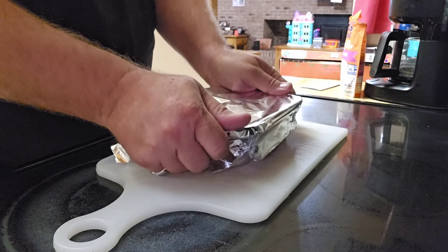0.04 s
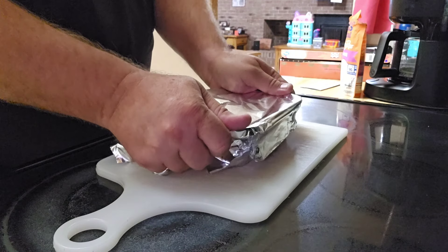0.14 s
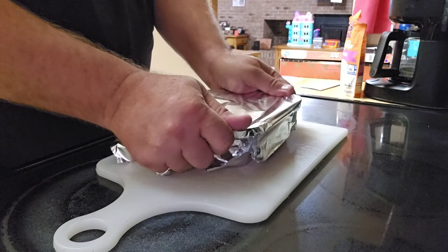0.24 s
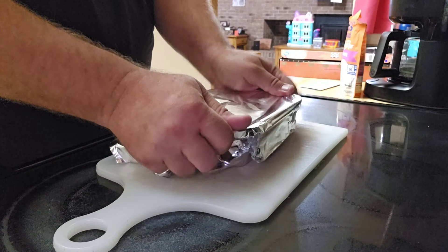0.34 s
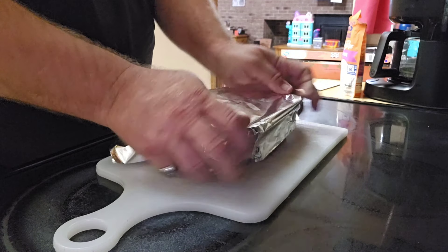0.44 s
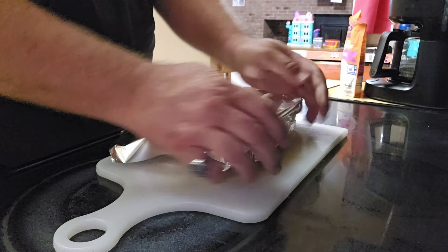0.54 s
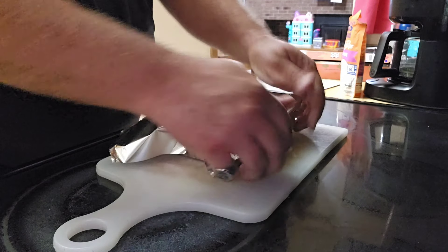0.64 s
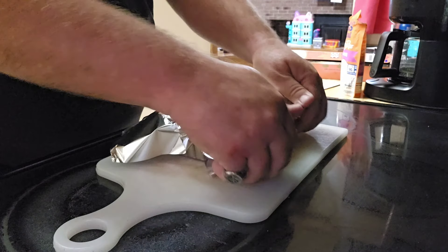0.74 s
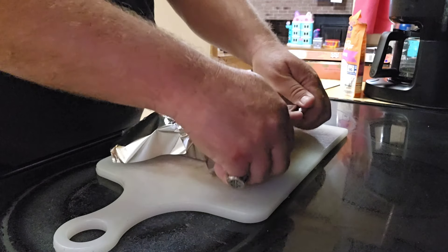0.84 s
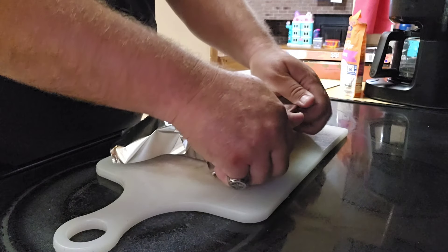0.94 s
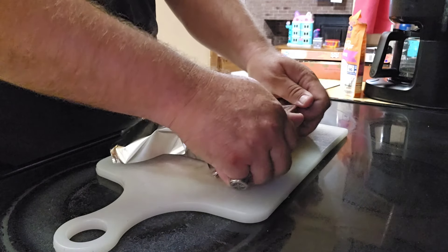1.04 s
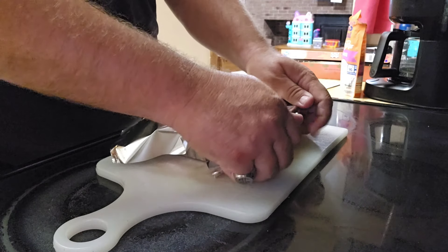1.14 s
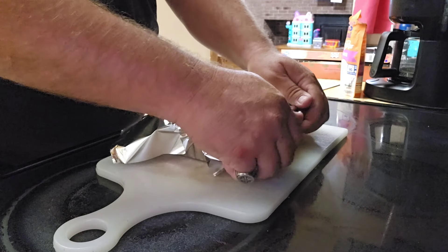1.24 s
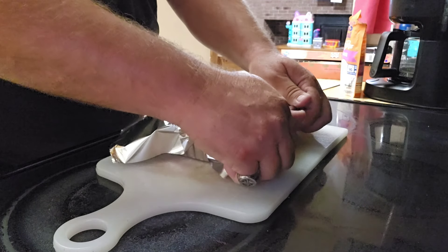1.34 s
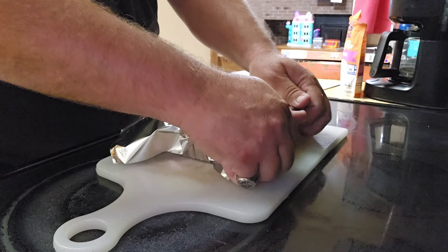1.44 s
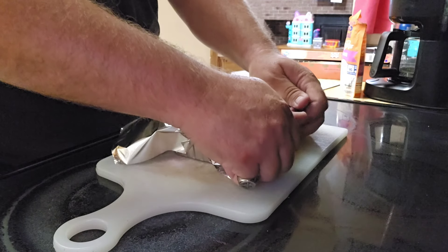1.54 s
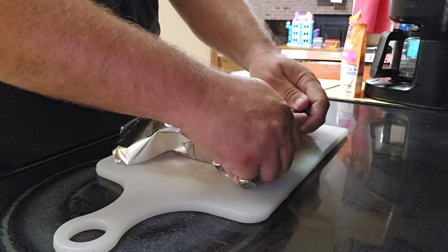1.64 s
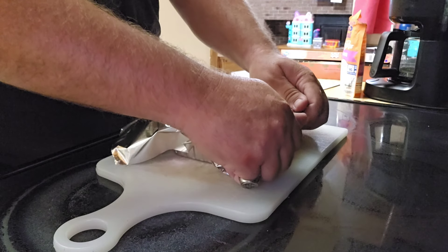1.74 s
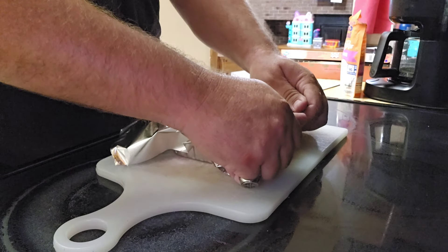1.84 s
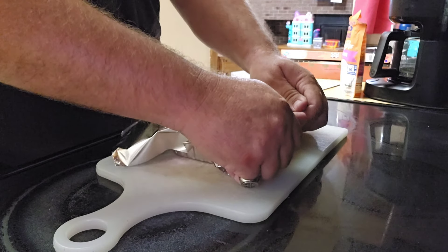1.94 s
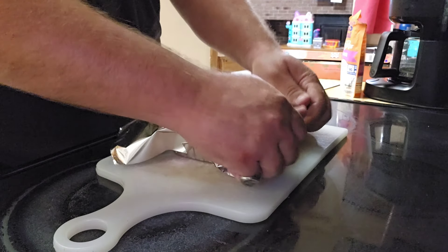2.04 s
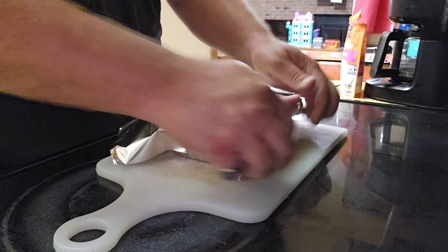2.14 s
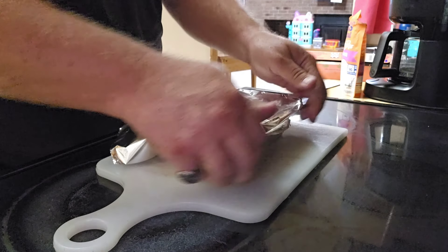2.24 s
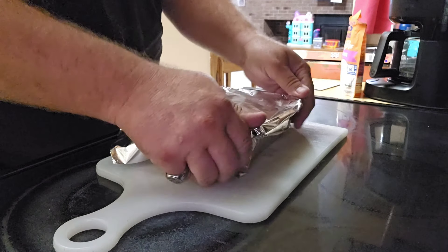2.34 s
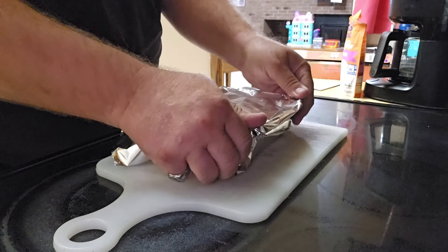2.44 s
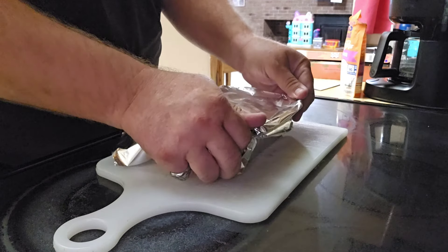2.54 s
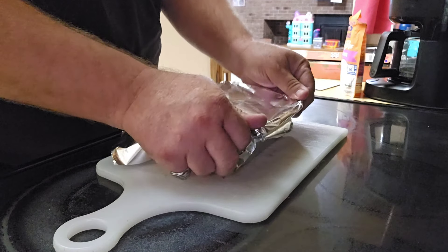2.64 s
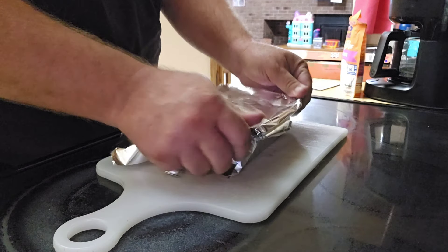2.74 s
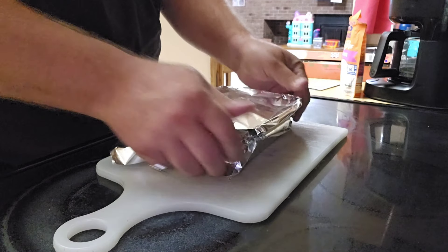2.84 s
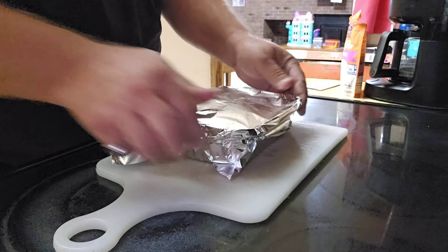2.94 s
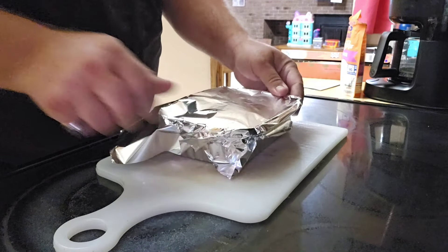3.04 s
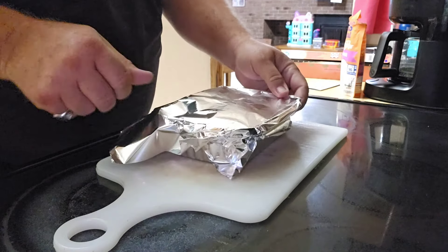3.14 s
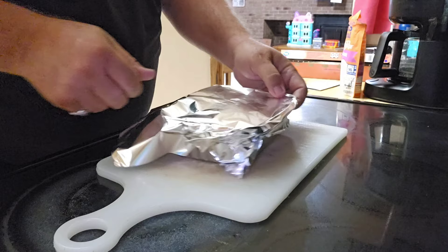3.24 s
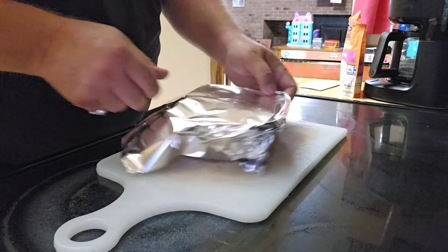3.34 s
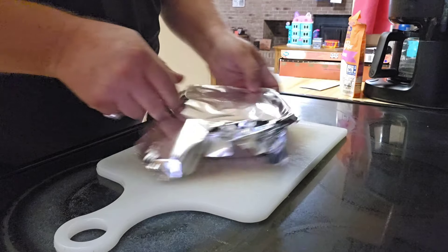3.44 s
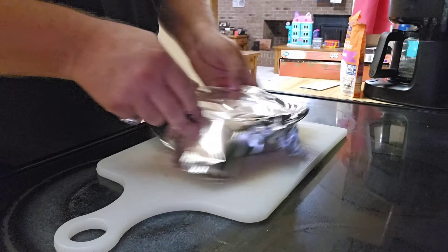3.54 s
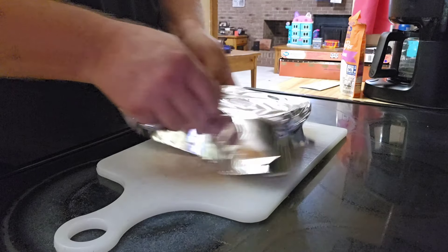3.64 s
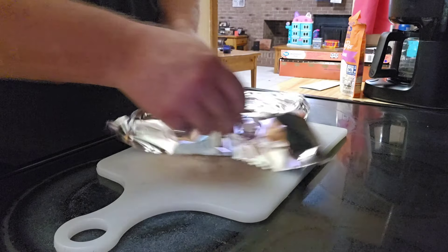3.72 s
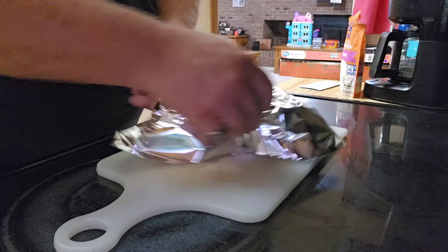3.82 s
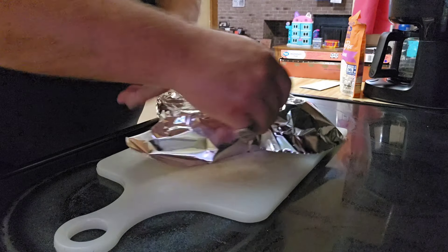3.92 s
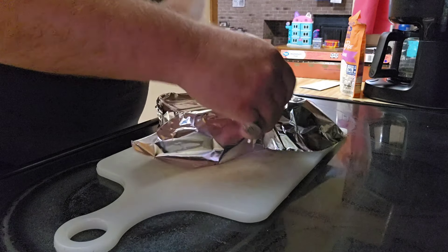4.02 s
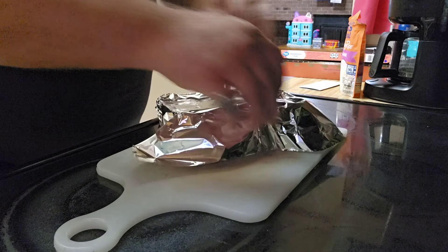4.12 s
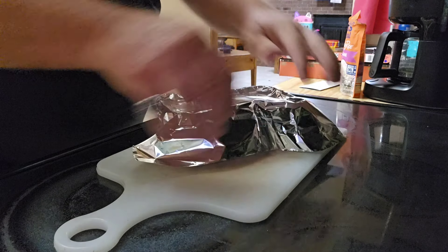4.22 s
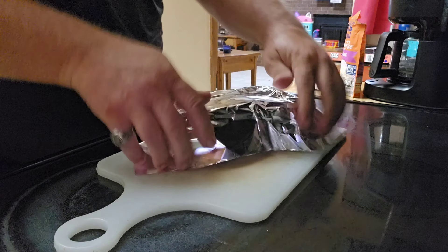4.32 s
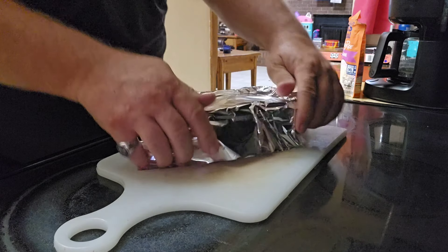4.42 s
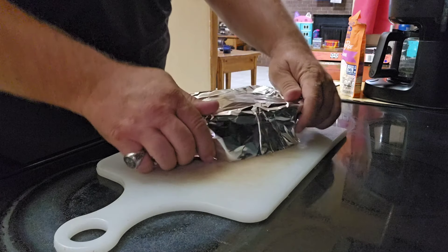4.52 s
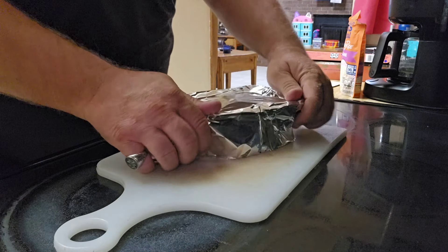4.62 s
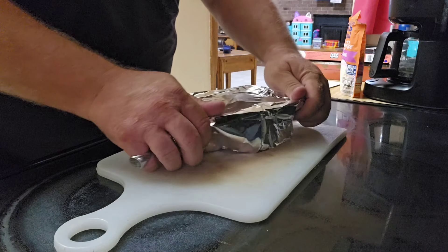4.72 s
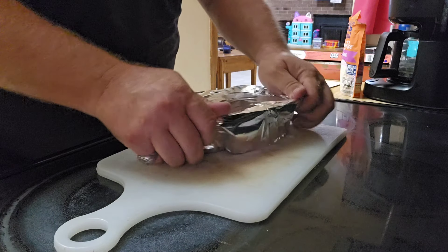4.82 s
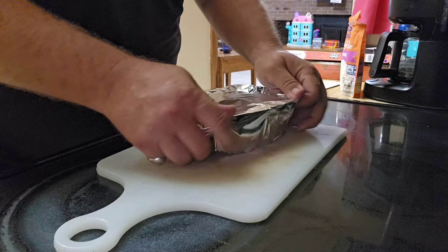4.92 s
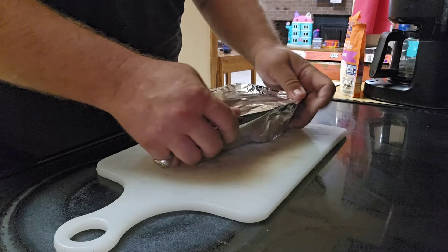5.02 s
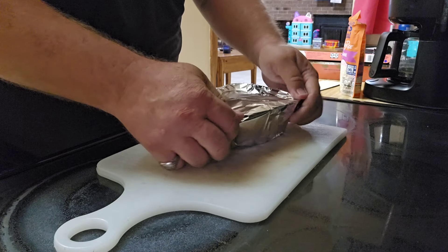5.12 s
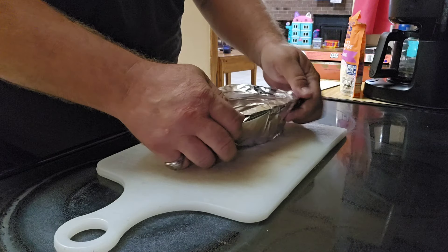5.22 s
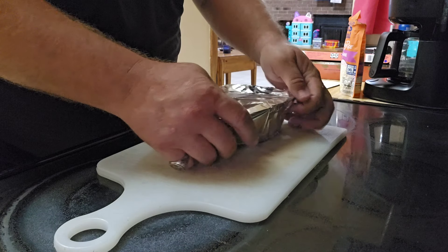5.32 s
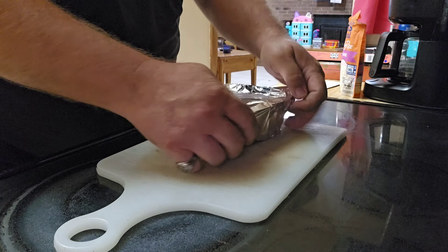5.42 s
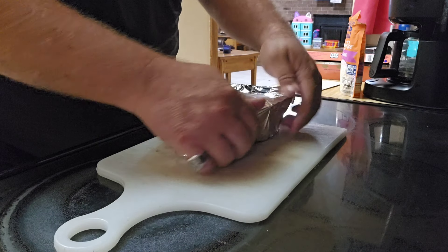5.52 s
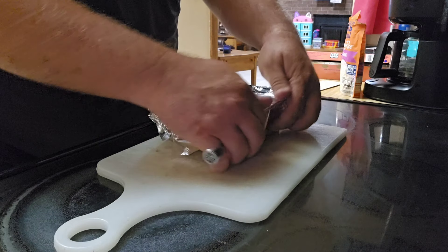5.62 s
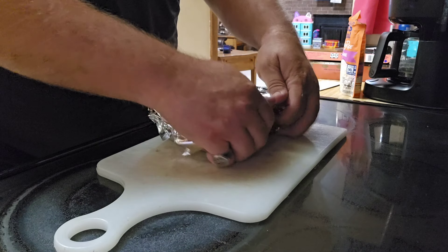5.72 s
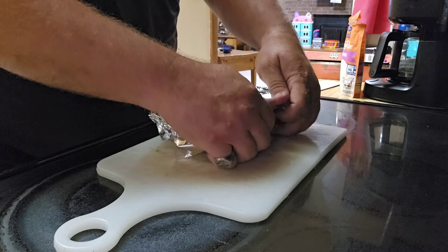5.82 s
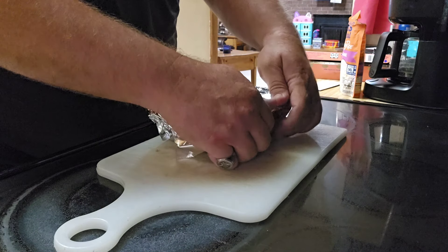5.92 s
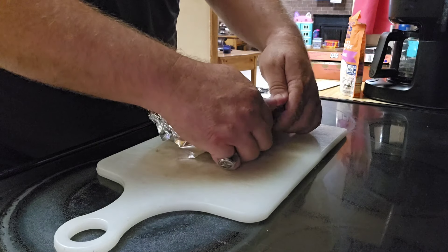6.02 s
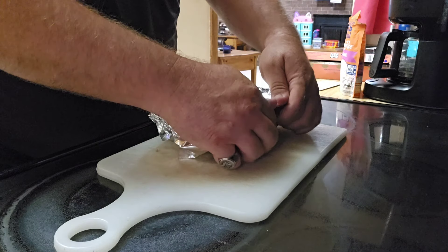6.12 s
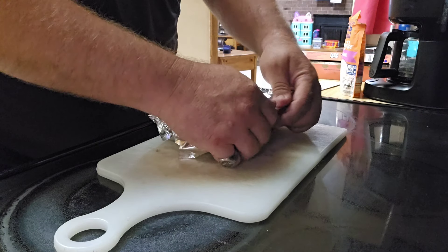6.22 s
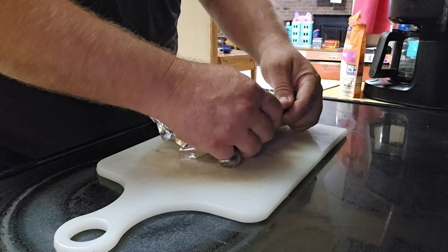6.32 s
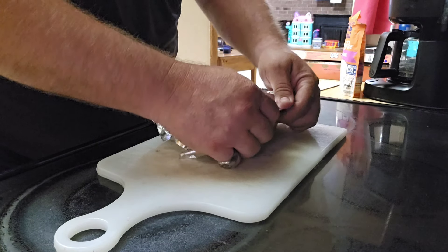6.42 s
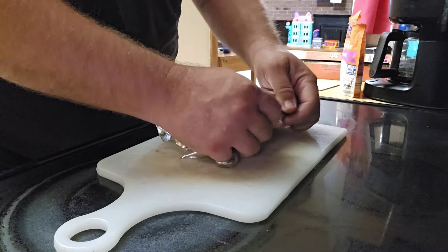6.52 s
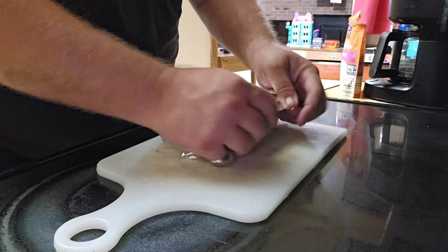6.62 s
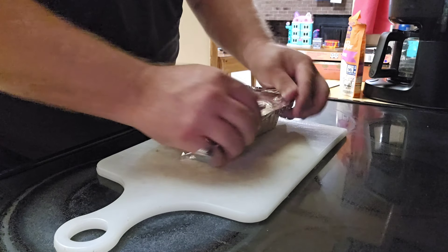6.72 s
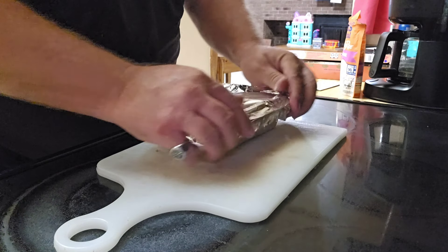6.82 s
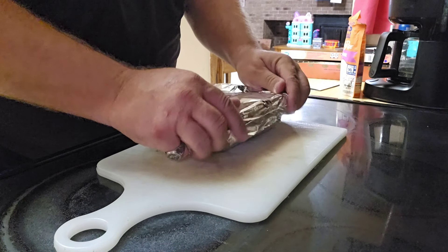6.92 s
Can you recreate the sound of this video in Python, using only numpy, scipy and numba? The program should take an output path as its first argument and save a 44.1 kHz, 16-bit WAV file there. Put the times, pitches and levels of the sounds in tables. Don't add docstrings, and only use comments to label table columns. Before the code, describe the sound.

Aluminium foil crackles and rustles in uneven bursts as hands fold and press it round a dish on a plastic board, close up.

```python
import sys
import numpy as np
from scipy import signal
from scipy.fft import rfft, irfft, next_fast_len
from scipy.io import wavfile
from numba import njit

SR = 44100
rng = np.random.default_rng(int(sys.argv[2]) if len(sys.argv) > 2 else 0)


def boost_factor(decibels):
    exponent = np.asarray(decibels, float) / 20
    return 10 ** exponent


def store_pcm(level_fs):
    pcm = np.round(np.clip(level_fs, -1, 1) * 32767).astype(np.int16)
    wavfile.write(sys.argv[1], SR, np.atleast_2d(pcm).T)


N = 307377

# f/Hz, level/dB per Hz
KITCHEN = [(12, -42), (20, -5), (74, -2.5), (116, -13.5), (150, -5.5), (193, -4), (255, -8), (305, -33),
           (459, -16), (527, -28.5), (949, -31.5), (1260, -30.5), (3160, -38), (5230, -37), (16000, -58)]
# f/Hz, width/Hz, level/dB
FRIDGE = [(60.3, 10, -63.5), (115, 28, -71.5), (181.15, 5.4, -66.5), (213, 5.8, -67.5), (258, 4.6, -73)]
# t/s, hold/s, rustle level/dB, dish ring/dB re rustle
FIRST_STROKES = [(0, 0.057, -30, -14), (0.068, 0.086, -34.5, -11), (0.194, 0.015, -29, -38),
                 (.25, 0.054, -40.5, -9), (0.338, 0.083, -33.5, -7.5), (0.501, 0.012, -33, -21),
                 (0.684, 0.36, -43.5, -9.5), (1.12, 0.042, -41, -24), (1.178, 0.0058, -35, -6),
                 (1.262, 0.14, -44.5, -3.5), (1.463, 0.3, -39.5, -10.5), (1.636, 0.3, -39, -35),
                 (2.004, 0.068, -36, -9.5), (2.31, 0.073, -43, -27), (2.413, 0.25, -37.5, -43),
                 (2.736, 0.079, -41.5, -19), (2.983, 0.066, -51, -8), (3.17, 0.04, -47.5, -22),
                 (3.283, 0.23, -43, -31), (3.48, 0.11, -42, -14)]
SECOND_STROKES = [(3.612, 0.1, -28, -8), (3.72, 0.14, -26, -2.5), (3.87, 0.18, -34.5, 0),
                  (4.075, 0.053, -34.5, 0.5), (4.352, 0.22, -32.5, -5.5), (4.432, 0.036, -30, -23),
                  (4.5, 0.14, -30.5, -8), (4.775, 0.017, -27, -19), (4.65, 0.15, -35, 5.5),
                  (4.82, 0.2, -36.5, -8), (5.02, 0.028, -30, -12), (5.111, 0.0074, -27.5, -6),
                  (5.2, 0.084, -40.5, -5), (5.326, 0.0057, -33.5, -5), (5.42, 0.086, -40, -1.5),
                  (5.578, 0.27, -39.5, -11), (5.891, 0.018, -38, -3), (5.96, 0.27, -36, -10),
                  (6.317, 0.25, -37, -7), (6.57, 0.071, -35.5, -6), (6.7, 0.048, -44, -7),
                  (6.792, .2, -34.5, -13.5)]
# f/Hz, level/dB per Hz
FOIL = [(180, -73), (300, -34), (713, 8.5), (900, -1.5), (1390, 0), (1810, -8), (2070, -6), (2480, -15.5),
        (3700, -14), (4100, -12), (5520, -14), (7440, -19), (10400, -27.5), (15200, -20), (16000, -37)]
# f/Hz, width/Hz, level/dB
DISH = [(776, 63, -9), (1100, 110, -6), (1230, 240, -1), (2060, 200, 0), (2190, 9.2, -3), (1420, 60, -1),
        (1840, 170, -8)]
# t/s, level/dB, f/Hz
TICKS = [(0.0164, -17, 6200), (0.0354, -10, 6360), (0.1142, -24, 4670), (0.1945, -22, 7550),
         (0.2061, -9, 4680), (0.3085, -23, 7200), (0.4364, -18, 7500), (0.47, -23, 6000),
         (0.508, -14, 6150), (0.7108, -20.5, 7240), (0.7713, -21, 6100), (0.856, -14, 6230),
         (0.9472, -13.5, 4200), (1.1278, -36, 4300), (1.3196, -14, 6800), (1.475, -19, 6600),
         (1.6556, -30, 4340), (1.738, -19, 4600), (1.8901, -17, 7300), (2.3064, -20, 7640),
         (2.4215, -16, 6170), (2.4843, -19, 4750), (2.5137, -13, 6330), (2.642, -14, 7400),
         (2.7818, -12.5, 6300), (2.999, -29, 4550), (3.1208, -18, 7840), (3.1494, -12.5, 10200),
         (3.5119, -14.5, 4930), (3.6094, -34, 4830), (4.0881, -10, 9400), (4.3265, -31, 7630),
         (4.3515, -24, 4600), (4.4765, -22, 7200), (4.6563, -11, 7400), (4.7127, -22, 7100),
         (4.741, -19, 8000), (5.025, -31, 5200), (5.025, -9.5, 7500), (5.109, -25, 6580),
         (5.3128, -15, 6660), (5.4021, -38, 6100), (5.5735, -30, 5740), (5.7164, -19, 6400),
         (5.8242, -33, 6600), (5.885, -34, 6540), (5.8995, -29, 5440), (6.008, -22, 4350),
         (6.2077, -18, 7700), (6.2528, -13, 5300), (6.321, -29, 5550), (6.3965, -19, 6200),
         (6.7935, -23.5, 8100), (6.8568, -28, 5400), (6.87, -10.5, 6000), (6.895, -21, 6000)]
# t/s, level/dB, f/Hz
MORE_TICKS = [(0.049, -15, 6240), (0.231, -21, 5860), (0.2504, -24, 5470), (0.2694, -42, 5430),
              (0.2898, -41, 5300), (0.4094, -19, 6130), (3.015, -28, 5750), (3.2221, -28, 7500),
              (3.3287, -20.5, 4660), (4.585, -20, 7200), (4.78, -16, 5600), (4.8014, -26, 4000),
              (6.168, -16, 4300), (6.4244, -15, 5740), (6.4444, -24, 5540), (6.597, -21, 4360),
              (6.6243, -20, 6250), (6.815, -9.5, 7630), (6.84, -20, 9100)]
# t/s, level/dB, panel level/dB re fold, length/ms
NEAR_CORNER = [(.0284, -29.5, -11.5, 11.4), (.06, -31, 2, 13.7), (.114, -31.5, -2, 8.7),
               (.1616, -41, 8.5, 9.4), (.206, -16, -24, 1.67), (.2275, -34, -23, 2.3),
               (.3065, -27.5, -10.5, 6.4), (.3567, -35, 7, 10.5), (.3872, -28.5, -20, 25),
               (.4375, -24, -32, 4.8), (.4709, -33.5, -1, 8.9), (.5069, -27, -36, 12.5)]
END_TUCK = [(0.7098, -30, -18, 24.7), (0.724, -31.5, -13, 7.3), (0.7706, -27, -9, 20.6),
            (0.828, -34.5, -15, 17), (0.8577, -26, -13, 5.4), (0.869, -33, -21, 7.2),
            (.893, -32.5, -6, 7.6), (0.947, -43, -2, 6), (0.972, -36.5, 5.5, 5.2), (1.045, -41, 0, 23),
            (1.1266, -24.5, -12.5, 5), (1.157, -31, -6, 26)]
END_SQUEEZE = [(1.2705, -44, -3, 14), (1.319, -27.5, -5.5, 5.1), (1.3478, -36, -10, 10),
               (1.3727, -28.5, -4, 4.5), (1.4055, -33.5, -28, 6.1), (1.424, -38, 4, 6.4),
               (1.473, -26.5, -9, 4.25), (1.489, -31.5, -19, 5.3), (1.506, -30.5, 1, 5.5),
               (1.5425, -27.5, 5, 7.1), (1.6043, -33.5, 1, 8.6), (1.6576, -33.5, -18, 21),
               (1.6822, -35.5, -5, 22), (1.7392, -30, -10, 14), (1.761, -26.5, -11, 6.3),
               (1.8043, -37.5, -29, 16.6), (1.8255, -35.5, -33, 34), (1.8885, -25.5, -7, 12.8),
               (2.027, -26.5, -10, 25.7), (2.1298, -37.5, 3.5, 5.8)]
TOP_EDGE = [(2.3004, -28.5, -11.5, 11), (2.349, -40.5, -3, 13.4), (2.42, -30, -29, 6.4),
            (2.437, -28, -40, 4), (2.484, -33, -29, 9.1), (2.5116, -26.5, -16, 10.8),
            (2.5471, -32.5, -2, 16), (2.6432, -24, -10, 5), (2.753, -35.5, -12, 12),
            (2.7817, -28.5, -7, 11.5), (2.996, -38.5, -25, 6.2), (3.01, -37.5, -36, 14),
            (3.086, -49.5, -14, 3.8), (3.1196, -33.5, -23, 3.8), (3.148, -35, -39, 3.9),
            (3.191, -39, -8, 15), (3.2185, -32.5, -22, 7.5), (3.299, -34.5, -2, 11.7),
            (3.3253, -46.5, -21, 26), (3.41, -35.5, -24, 26.5), (3.446, -38, -4.5, 36),
            (3.507, -31, -25, 15)]
TURN_AND_WRAP = [(3.789, -25, 0.5, 35), (3.964, -44.5, -19, 61), (4.084, -29.5, -9, 28.4),
                 (4.351, -17, -6.5, 15.3), (4.4734, -25.5, -6, 12.6), (4.5141, -27, 3.5, 27),
                 (4.58, -29, 3, 12), (4.6491, -25.5, 4.5, 14), (4.711, -27, 1, 12.7),
                 (4.7373, -22, -3, 10.4), (4.8926, -24.5, -3, 2.7), (4.9255, -32, 3.5, 5.7),
                 (4.9706, -30.5, -0.5, 15.7), (5.0216, -24.5, -20, 18), (5.1069, -33, -2, 13),
                 (5.1585, -34, 0, 15.8), (5.2252, -33, -9, 32), (5.294, -31, 0, 5.6),
                 (5.3134, -26, -10, 6.3), (5.4003, -32, -3, 15), (5.436, -37.5, -18, 7.6),
                 (5.475, -33.5, -1.5, 19.3)]
FAR_TUCK = [(5.5724, -30.5, -19, 2.9), (5.595, -31, -3, 24.4), (5.6637, -34.5, -27, 16),
            (5.727, -27, -6.5, 9.5), (5.767, -28.5, -1, 9.8), (5.8212, -34, -8.5, 13.6),
            (5.844, -48, -20, 2.3), (5.8614, -44, 0, 3.9), (5.8999, -20, -6.5, 6.5), (5.932, -31.5, -4, 17),
            (5.9714, -38, 1, 14), (6.0067, -34.5, -7.5, 13.3), (6.045, -37, -17, 23),
            (6.1122, -35.5, -26, 27)]
FAR_SQUEEZE = [(6.168, -38, -6, 5.1), (6.2061, -21.5, -13.5, 4.2), (6.255, -27.5, -28, 3.3),
               (6.2762, -30, -3, 5.9), (6.332, -28.5, 0, 5.9), (6.396, -25.5, -4, 11), (6.515, -41, 6, 11),
               (6.5303, -34, -5, 34), (6.547, -29.5, -3, 5.6), (6.5764, -29.5, -21, 11.8),
               (6.586, -47, -16, 31), (6.628, -37.5, 4, 7.2), (6.671, -39, -22, 13), (6.7196, -33, -6, 24),
               (6.7938, -22, -26, 3.9), (6.807, -26.5, -12, 22), (6.862, -26, -7, 10),
               (6.8908, -25, -14, 18.3), (6.9469, -30.5, -9, 21.5)]
# t/s, level/dB, panel level/dB re fold, length/ms
MORE_FOLDS = [
    (2.296, -43, -13, 9.7),
    (4.324, -33, -9, 24),
    (5.886, -26.5, -12, 21),
]
# t/s, level/dB, f/Hz
BUMPS = [(0.106, -47, 670), (0.388, -45.5, 480), (0.51, -43, 410), (1.06, -48.5, 700), (1.186, -57, 690),
         (1.539, -46, 378), (1.609, -52, 410), (1.888, -44, 710), (2.098, -47, 463), (2.572, -60, 690),
         (2.639, -72, 520), (3.672, -36, 670), (3.738, -43, 710), (3.973, -44, 467), (4.351, -45, 474),
         (4.513, -35, 687), (4.793, -48, 680), (4.856, -48, 546), (5.02, -42, 446), (5.107, -41, 468),
         (5.483, -40, 704), (5.606, -37, 269), (6.394, -52, 675), (6.483, -50, 596), (6.905, -51, 403)]
# t/s, level/dB, f/Hz
POPS = [(0.1128, -29, 1330), (0.1454, -33, 2060), (0.199, -29, 1440), (0.3566, -30.5, 1960),
        (0.387, -37, 1420), (0.7213, -38, 1230), (0.828, -36.5, 1230), (1.187, -27, 1216),
        (1.474, -29, 1980), (1.5439, -19, 2240), (1.6602, -44, 1210), (1.6799, -31, 1356),
        (1.8906, -30, 1398), (2.0103, -36, 1590), (2.2985, -42, 1870), (3.1213, -37.5, 2250),
        (3.2201, -37, 2180), (3.2894, -44, 2290), (3.3139, -30, 1960), (3.3278, -28.5, 2280),
        (3.4136, -38, 2100), (3.604, -38, 2060), (3.6177, -36, 2050), (3.665, -23, 1390),
        (3.7246, -21, 2170), (3.8122, -27, 2050), (4.0916, -28, 2020), (4.3306, -34.5, 1950),
        (4.3565, -20.5, 2380), (4.5246, -29, 2190), (4.5984, -30, 1430), (4.6206, -20, 2050),
        (4.692, -24, 1150), (4.7097, -27, 2080), (4.7393, -24.5, 1144), (4.801, -50, 2200),
        (4.9581, -33.5, 1600), (4.976, -23, 2190), (5.0236, -24, 2120), (5.1088, -22, 2250),
        (5.1711, -41, 1640), (5.4084, -32, 2320), (5.5463, -35.5, 2040), (5.5865, -38, 2200),
        (5.605, -24, 2090), (5.7279, -32, 2060), (5.8293, -32, 2360), (5.8962, -41, 2330),
        (6.0073, -33, 1590), (6.0422, -31, 1410), (6.1374, -29, 1610), (6.207, -32.5, 1170),
        (6.3207, -33, 2190), (6.332, -24, 2350), (6.3942, -27, 1420), (6.5774, -30, 2050),
        (6.5952, -35, 1266), (6.794, -43, 2050), (6.8548, -20, 2040), (6.9496, -28, 2080)]
# t/s, peak level/dB, f/Hz
KNOCKS = [(1.238, -53, 172), (1.605, -42, 185), (2.014, -56, 165), (3.679, -40, 250), (3.819, -35, 230),
          (3.931, -37, 148), (4.646, -36, 248), (4.712, -31.5, 201), (5.101, -44, 183), (5.599, -40, 266),
          (5.898, -59, 212)]
# t/s, level/dB, low mode level/dB re high
FLICKS = [
    (1.893, -39, 3.5),
    (2.05, -45, 11.5),
    (3.329, -41, -23),
    (3.725, -22.5, 0),
    (3.741, -21, -25),
    (3.76, -26, -16),
    (3.815, -25.5, -4),
    (6.333, -28, -27),
]
# f/Hz, level/dB
LEFT = [(200, 1.5), (700, 3.5), (1300, -0.5), (2400, 3), (8000, 4), (15000, 4)]

RIGHT_LAG_S, LAG_SPREAD_S = .00014, .00005
ATTACK_DB_PER_S, RELEASE_DB_PER_S = 722, 339
PANEL_DB, PANEL_PER_DB = -13, 0.03
TIGHT_DB, TIGHT_PER_DB = -5, 0.3
PATCHY_DB, PATCHES_PER_S = 33, 35
FOLD_HZ, FOLD_TIGHT_DB = 5944, -3
LEAD_DB, TIGHT_LEAD_DB = -2.5, 7
FLICK_RING_S = 0.0047
ROOM_T60_S, ROOM_DB = 0.11, -12
TOP_HZ = 15900


def level(x, db):
    return x * boost_factor(db) / np.sqrt(np.mean(x ** 2))


def colour(x, points, lo_hz=0.74, hi_hz=1e5):
    size = next_fast_len(N)
    hz = np.arange(1, size // 2 + 2) * SR / size
    at, db = np.transpose(points)
    gain = boost_factor(np.interp(np.log(hz), np.log(at), db))
    gain = gain / np.sqrt((1 + (lo_hz / hz) ** 8) * (1 + (hz / hi_hz) ** 8))
    return irfft(rfft(x, size) * gain, size)[..., :N]


def ring(x, hz, width):
    return signal.lfilter(*signal.iirpeak(hz, hz / width, fs=SR), x)


@njit
def pings(start, hz, tau, gain, lag, beam, out):
    for k in range(len(start)):
        p = np.exp(2j * np.pi * hz[k] / SR - 1 / (tau[k] * SR))
        for c in range(2):
            at = start[k] * SR + c * lag[k] * SR
            i = int(at) + 1
            z = gain[k] * beam[k] ** (c - .5) * p ** (i - at)
            for j in range(i, min(i + int(5 * tau[k] * SR) + 1, out.shape[1])):
                out[c, j] += z.imag
                z *= p
    return out


def buckles(start, hz, tau, gain):
    lag = RIGHT_LAG_S + LAG_SPREAD_S * rng.standard_normal(start.shape)
    hz = np.clip(hz, 60, 20000)
    start_in = np.clip(start, .001, N / SR)
    flat = [np.ravel(v + 0. * start) for v in (start_in, hz, np.abs(tau), gain, lag)]
    beam_db = np.clip(flat[1] / 3000, 0, 1) * 5 * rng.standard_normal(start.size)
    return pings(*flat, boost_factor(beam_db), np.zeros((2, N)))


def struck(table, cycles, spread_oct, gain_db, count, lo_hz):
    s, db, hz = np.transpose(table)[:, :, None]
    g = rng.standard_normal((len(table), 2, count))
    overtone = np.arange(count) > 0
    hz = hz * 2 ** (spread_oct * g[:, 0] * overtone)
    start = s + 4 * np.abs(g[:, 1]) / hz
    rings = buckles(start, hz, cycles / hz, boost_factor(db + gain_db - 8.1 * overtone))
    return colour(rings, [(100, 0), (200, 0)], lo_hz)


def kitchen():
    mid, side = rng.standard_normal((2, N))
    side = colour(side, [(20, -15), (200, -14), (600, -6), (2000, 0)])
    air = level(colour(mid + side * np.array([[1], [-1]]), KITCHEN), -58.5)
    drone = 0
    for hz, width, db in FRIDGE:
        once = ring(rng.standard_normal(N), hz, width)
        drone = drone + level(ring(once, hz, width), db)
    return (air + drone) * boost_factor(np.array([[.6], [-.6]]))


def hands():
    s, hold, db, dish_db = np.transpose(FIRST_STROKES + SECOND_STROKES)[:, :, None]
    t = np.arange(0, N + 100, 100) / SR
    rise_db = ATTACK_DB_PER_S * np.clip(s - t, 0, None)
    fall_db = RELEASE_DB_PER_S * np.clip(t - s - hold, 0, None)
    power = boost_factor(2 * np.maximum(db - (rise_db + fall_db), -120))
    work_db = 10 * np.log10(power.sum(0))
    ring_db = 10 * np.log10((power * boost_factor(2 * dish_db)).sum(0)) - work_db
    return [np.interp(np.arange(N) / SR, t, v) for v in (work_db, ring_db)]


def rustle(count=110000, clusters=450):
    heads = rng.random(clusters) * N / SR
    head_db = np.minimum(2.5 * rng.exponential(size=clusters), 8)
    head_hz = 1500 + 10000 * rng.random(clusters)
    which, u = rng.integers(clusters, size=count), rng.random((4, count))
    alone = u[0] < .4
    start = np.where(alone, u[1] * N / SR, heads[which] - 0.0069 * np.log(u[1]))
    hz = 200 + 16500 * u[2]
    lean_db = -4 * np.abs(np.log2(hz / head_hz[which]))
    db = np.where(alone, -1.5, head_db[which] + lean_db) - 0.18 * np.log(u[3])
    tau = np.clip(5 / hz, .0009, .004)
    swarm = buckles(start, hz, tau, boost_factor(db) / np.sqrt(tau))

    work_db, dish_db = hands()
    panel_db = np.minimum(PANEL_DB + PANEL_PER_DB * (work_db + 45.5), -3)
    tight_db = np.minimum(TIGHT_DB + TIGHT_PER_DB * (work_db + 37.0), 1.5)
    patch = np.arange(N) * PATCHES_PER_S / SR

    def grip(k):
        return boost_factor(PATCHY_DB * np.interp(patch, np.arange(1000), u[3, k::7][:1000] - .5))

    hollow, dish = 0, 0
    for k, (f, w, mode_db) in enumerate(DISH[:3]):
        hollow = hollow + (-1) ** k * boost_factor(mode_db) * ring(swarm * grip(k), f, w)
    for k, (f, w, mode_db) in enumerate(DISH[3:]):
        dish = dish + (-1) ** k * boost_factor(mode_db) * ring(swarm[0] * grip(k + 3) ** .1, f, w)
    panels = level(colour(swarm, FOIL, 925, 3700), -3.5) + level(hollow, -3)
    scrape = colour(swarm, [(200, 0), (600, 0)], 340, 600)
    dragged = level(dish, -7.0) + level(scrape, -19.5)
    creases = level(colour(swarm, FOIL, 2500, 9000), 0)
    tight = level(colour(swarm, FOIL, 9000), 0)
    sheet = creases + boost_factor(panel_db) * panels + boost_factor(dish_db) * dragged + boost_factor(tight_db) * tight
    return sheet * boost_factor(work_db - 4.5)


def ticks():
    return struck(TICKS + MORE_TICKS, 11, 0.665, -10.5, count=8, lo_hz=2500)


def snaps(count=120, modes=18):
    folds = NEAR_CORNER + END_TUCK + END_SQUEEZE + TOP_EDGE + TURN_AND_WRAP + FAR_TUCK + FAR_SQUEEZE + MORE_FOLDS
    s, db, panel_db, ms = np.transpose(folds)[:, :, None]
    u, g = rng.random((len(s), 4, count)), rng.standard_normal((len(s), 5, count))
    span = np.clip(ms, 1, 70) / 1000
    start = s + span * (.9 * u[:, 0] ** 1.15 - .17 * np.log(u[:, 1]))
    early = np.arange(count) < count // 6
    start = np.where(early, s - .007 * u[:, 1] ** 2, start)
    lead = np.exp(-np.abs(start - s) / 0.00032)
    db = db - 11 * early + LEAD_DB * lead
    share = 2 * np.sqrt(span / count)
    again = np.arange(count) % modes

    middle_hz = FOLD_HZ * 2 ** (.45 * g[:, 0, again] + .04 * g[:, 4])
    middle = buckles(start, middle_hz, .0013, boost_factor(db + 27.0) * share * g[:, 1])
    panel_hz = 750 * 3.8 ** u[:, 2, again]
    panel = buckles(start, panel_hz, 0.99 / panel_hz, boost_factor(db + panel_db + 17.5) * share * g[:, 2])
    tight_hz = 8500 + 7500 * u[:, 3]
    tight_db = db + FOLD_TIGHT_DB + TIGHT_LEAD_DB * lead + 30.5
    tight = buckles(start, tight_hz, .0003, boost_factor(tight_db) * share * g[:, 3])
    middle = colour(middle, [(2500, -14.0), (3700, -7.0), (4100, -1.0)])
    panel = colour(panel, [(400, -14.5), (900, -1.5), (3000, 15.5)])
    return middle + panel + tight


def bumps():
    return struck(BUMPS, 3.6, 0.052, -0.5, count=2, lo_hz=353)


def pops():
    return struck(POPS, 9.6, 0.099, -3, count=3, lo_hz=800)


def knocks(count=4):
    s, db, hz = np.transpose(KNOCKS)[:, :, None]
    spread = 2 ** (.3 * rng.standard_normal((len(KNOCKS), count)))
    return buckles(s + 0 * spread, hz * spread, 0.019, boost_factor(db - 16.0) / np.sqrt(spread))


def flicks():
    s, db, low_db = np.transpose(FLICKS)[:, :, None]
    high_low_hz = np.array([DISH[3][0], DISH[5][0]])
    hz = high_low_hz * (1 + .008 * rng.standard_normal((len(s), 2)))
    rings = buckles(s + 0 * hz, hz, FLICK_RING_S, boost_factor(db + low_db * [0, 1]))[0]
    return colour(rings, [(100, 0), (200, 0)], 1000)


def room(x):
    t = np.arange(int(.4 * SR)) / SR
    noise = signal.lfilter([1], [1, -.1], rng.standard_normal((2, len(t))))
    tail = noise * boost_factor(-60 * t / ROOM_T60_S) * (t > .004)
    response = level(tail, ROOM_DB) / np.sqrt(len(t))
    send = colour(x[:1], [(300, 5.5), (1200, 5.3)])
    return x + signal.fftconvolve(send, response, axes=1)[:, :N]


def scene():
    background = kitchen()
    foil = rustle() + ticks() + snaps() + bumps() + pops() + knocks() + flicks()
    left, right = room(foil)
    half = np.array(LEFT) * [1, .5]
    return np.array([colour(left, half), colour(right, half * [1, -1])]) + background


def band_limit(x):
    return signal.sosfilt(signal.butter(12, 17000, fs=SR, output="sos"), x)


def record(dry):
    steep = signal.ellip(10, .3, 70, TOP_HZ, fs=SR, output="sos")
    mix = signal.sosfilt(steep, dry)
    return band_limit(mix)


dry = scene()
out = record(dry)
store_pcm(out)
```